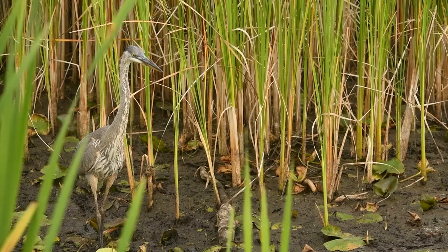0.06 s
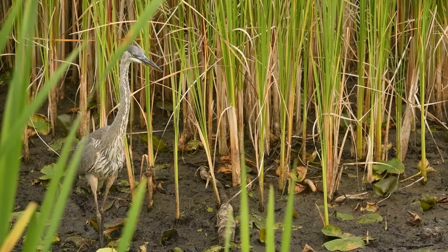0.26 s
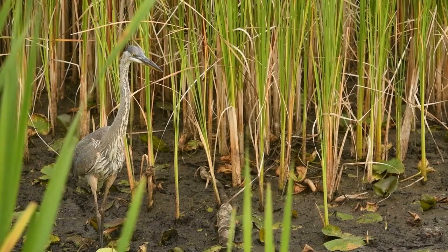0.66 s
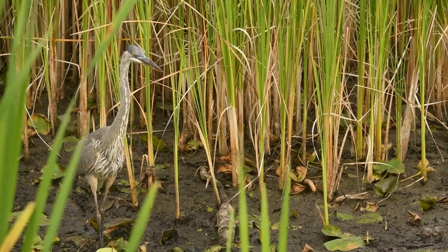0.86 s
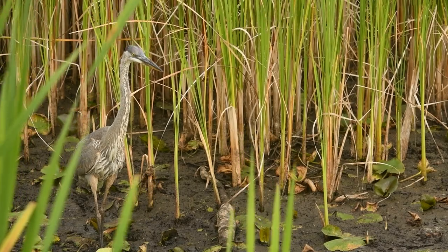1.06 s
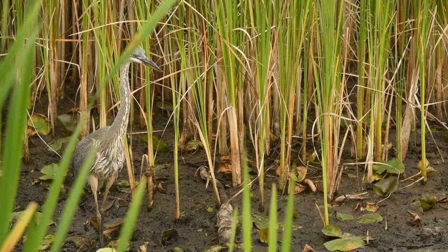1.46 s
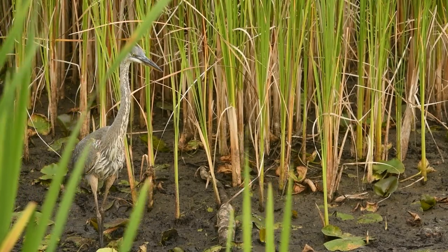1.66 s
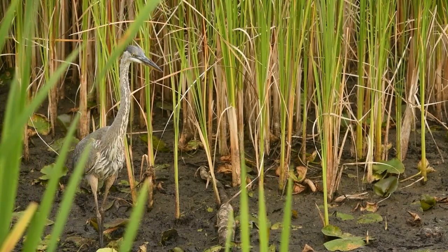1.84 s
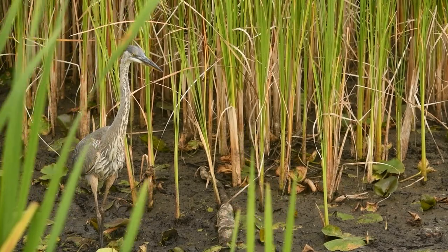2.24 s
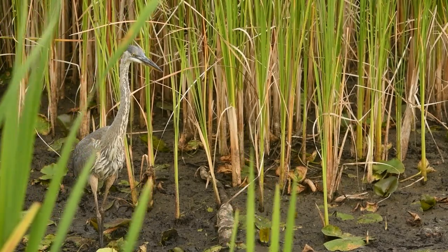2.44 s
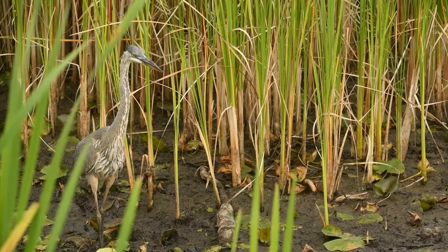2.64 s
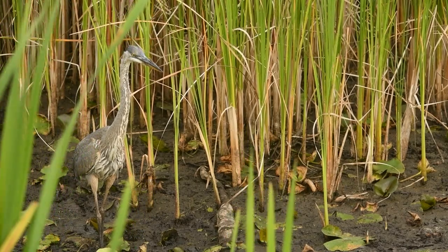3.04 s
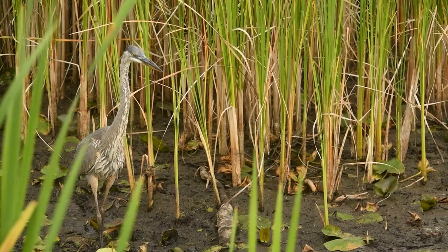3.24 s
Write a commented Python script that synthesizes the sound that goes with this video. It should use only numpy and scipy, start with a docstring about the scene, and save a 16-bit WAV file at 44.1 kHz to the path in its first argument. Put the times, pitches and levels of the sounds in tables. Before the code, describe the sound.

Wind buffets the microphone with low, fluttering thumps, strongest early and then easing. Behind it, reeds rustle softly and high crickets chirp over a distant rush at a wetland edge. Later, a dry stalk snaps.

```python
"""Wind at a reed bed

Eddies in a light wind thump on two microphone ports; the strongest overload the microphones and rasp.
Leaves hiss by friction and tick by impact over a far, even rush. Crickets chirp and trill by
stridulation, and dry stalks crack, with one clear snap among fainter ones."""
import sys
import numpy as np
from scipy import signal
from scipy.fft import rfft, irfft, next_fast_len
from scipy.io import wavfile
from scipy.ndimage import uniform_filter1d, map_coordinates

SR = 44100
rng = np.random.default_rng(int(sys.argv[2]) if len(sys.argv) > 2 else 0)


def to_wav(s):
    """Save 16-bit WAV."""
    ch = np.atleast_2d(s).T  # columns
    pcm = np.round(np.clip(ch, -1, 1) * 32767)  # PCM
    wavfile.write(sys.argv[1], SR, pcm.astype(np.int16))


N = 145530


def amp(db):
    """Amplitude ratio of a level in decibels."""
    return 10 ** (np.asarray(db) / 20)


def unit(x):
    """Normalisation to an rms of 1."""
    return x / np.sqrt(np.mean(x ** 2) + 1e-20)


def along(points, hz):
    """Interpolation of (frequency [Hz], value) points on a logarithmic frequency axis."""
    f, v = np.transpose(points)
    return np.interp(np.log(hz + 1), np.log(f + 1), v)


def curves(rows):
    """Linear interpolation in time: one value per sample for each column after the first."""
    times, *columns = np.transpose(rows)
    return np.array([np.interp(np.arange(N) / SR, times, c) for c in columns])


def wobble(rate):
    """Smooth random modulation: a spline through `rate` knots a second."""
    return map_coordinates(rng.standard_normal(1000), [np.arange(N) * rate / SR], mode="wrap")


def pan(db):
    """Left and right gains for a level difference, left minus right."""
    return amp([[db / 2], [-db / 2]])


def filtered(x, response):
    """Linear filtering: the spectrum of x is multiplied by a frequency response."""
    size = next_fast_len(N + 8192)
    return irfft(rfft(x, size) * response(np.fft.rfftfreq(size, 1 / SR)), size)[..., :N]


def noise(spectrum):
    """Coloured noise, incoherent between left and right."""
    return unit(filtered(rng.standard_normal((2, N)), lambda hz: amp(along(spectrum, hz))))


def rush(spectrum, coherence, left_lag_s, patchy_db):
    """Partly coherent stereo noise with an arrival delay and random patches of gain in time and pitch."""
    cells = signal.stft(rng.standard_normal((2, N)), nperseg=512)[2]
    patches = uniform_filter1d(rng.standard_normal(cells.shape[1:]), size=6, axis=0)
    patches = uniform_filter1d(patches, size=14, axis=1)
    pair = signal.istft(cells * amp(patchy_db * unit(patches)), nperseg=512)[1][:, :N]
    angle = lambda hz: np.arccos(np.clip(along(coherence, hz), -1, 1)) / 2
    colour = lambda hz: amp(along(spectrum, hz)) * [np.cos(angle(hz)), np.sin(angle(hz))]
    mid, side = filtered(pair, colour)
    delay = lambda hz: np.exp(1j * np.pi * left_lag_s * np.outer([-1, 1], hz))
    return unit(filtered(np.array([mid + side, mid - side]), delay))


def buffeting():
    """Turbulent pressure rumbles on each port; single eddies thump, flutter and kick as the core passes."""
    # turbulence on each port (time [s], level [dB])
    left_flow = [(0, -45.5), (.43, -50), (.55, -18.5), (.8, -21), (1.05, -18.5), (1.17, -21.5), (1.35, -26),
                 (1.7, -33.5), (2, -27.5), (2.45, -36.5), (2.9, -29.5), (3.3, -32.5)]
    right_flow = [(0, -50), (.39, -37.5), (.47, -19), (.6, -31), (.76, -18.5), (1.3, -25), (1.55, -20.5),
                  (1.7, -37), (1.95, -25.5), (2.2, -30.5), (2.38, -35), (2.55, -25.5), (2.88, -31),
                  (3, -36), (3.3, -41)]
    # single eddies (time [s], port [L or R], thump level [dB], flutter re thump [dB], half length [s])
    eddies = [(0.207, "R", -23, -31, 0.013), (0.331, "R", -15.5, -27, 0.012),
              (0.483, "R", -5.5, -11.5, 0.0065), (0.515, "R", -13, -16, 0.006),
              (0.545, "L", -23, -15, 0.0037), (0.566, "L", -10.5, -12, 0.007),
              (0.653, "L", -21, -4.5, 0.0033), (0.672, "L", -4.5, -15, 0.0019),
              (.678, "R", -12, -19, 0.0034), (0.73, "R", -10.5, -23, 0.0087), (0.799, "L", -12, -9, 0.0054),
              (0.801, "R", -14, -32, 0.0075), (0.829, "R", -16.5, -16, 0.0075),
              (0.87, "R", -16, -17, 0.0084), (0.909, "L", -11, -9, 0.0042),
              (0.926, "L", -8.5, -11.5, 0.0044), (0.953, "L", -14, -9.5, 0.0034),
              (0.998, "L", -17.5, -14, .012), (1.056, "L", -12, -18.5, .008),
              (1.085, "L", -9, -8.5, 0.0096), (1.096, "R", -13, -11.5, 0.0056),
              (1.121, "L", -12, -15, 0.0032), (1.229, "L", -6.5, -7.5, 0.0048),
              (1.243, "L", -9.5, -12, 0.0067), (1.253, "R", -7, -11, 0.0064),
              (1.282, "R", -14, -1.5, 0.0062), (1.3, "R", -10, -9, 0.0059), (1.349, "R", -17.5, -12, .016),
              (1.394, "R", -13.5, -17, 0.016), (1.422, "L", -13, -17.5, 0.0044),
              (1.477, "R", -19, -5.5, 0.005), (1.504, "R", -19.5, -17, 0.012),
              (1.605, "R", -20, -28, 0.019), (1.747, "L", -20, -43, 0.015),
              (1.881, "R", -19.5, -13.5, 0.015), (1.971, "R", -22.5, -12.5, 0.021),
              (2.022, "R", -18, -6.5, 0.01), (2.144, "L", -11, -32, 0.0045),
              (2.363, "L", -12.5, -34, 0.0043), (2.401, "L", -15.5, -21, 0.0047),
              (2.481, "L", -23, -24, 0.035), (2.716, "R", -21, -27, 0.012), (2.844, "R", -16, -50, 0.0079),
              (2.919, "R", -15.5, -16, 0.0079)]
    # spectra of the wind pressure (frequency [Hz], relative level [dB])
    rumble_spectrum = [(12, -10), (28, -4), (55, 2.5), (110, -4.5), (180, -11), (300, -19), (600, -56),
                       (1500, -65), (4000, -120)]
    thump_spectrum = [(15, -10), (35, -12.5), (65, -1.5), (120, 0), (180, -7), (280, -18), (500, -81),
                      (2000, -120)]
    flutter_spectrum = [(100, -93), (220, 13), (320, 15), (430, -4), (700, -12.5), (1000, -30), (1400, -31),
                        (3000, -40), (8000, -75)]
    flutter_grip = 0.74  # how closely the flutter follows the peaks of a thump
    core_s, core_at_db = 0.0013, -27.5  # half width of a core at this flutter level
    core_shrink, core_over_flutter_db = 0.37, 5  # stronger cores pass faster
    t = np.arange(N) / SR
    lumps = amp(3.75 * np.array([wobble(rate=15), wobble(rate=24)]))
    flow = amp(np.vstack([curves(left_flow), curves(right_flow)]))
    out = flow * unit(lumps * noise(rumble_spectrum))
    thump = noise(thump_spectrum)
    flutter = noise(flutter_spectrum) * (0.18 + np.logaddexp(0, 3 * thump)) ** flutter_grip
    for at_s, port, db, flutter_re_db, half_s in eddies:
        channel = "LR".index(port)
        flutter_db = db + flutter_re_db
        swell = np.exp(-.5 * ((t - at_s) / half_s) ** 2)
        for air, level in ((thump[channel], db), (flutter[channel], flutter_db)):
            burst = swell * air
            out[channel] += amp(level) * burst * np.linalg.norm(swell) / np.linalg.norm(burst)
        passage = (t - at_s) / core_s * amp(flutter_db - core_at_db) ** core_shrink
        spike = (1 - passage ** 2) * np.exp(-passage ** 2 / 2)
        out[channel] += amp(flutter_db + core_over_flutter_db) * spike
    return out


def leaves():
    """Friction between sliding leaves makes a hiss; their impacts ring as tiny damped ticks."""
    # spectrum of the hiss (frequency [Hz], relative level [dB])
    hiss_spectrum = [(600, -30), (2000, 2.5), (3500, 2.5), (5000, 3), (6300, 0), (7600, -1.5), (10000, -2),
                     (13800, -1.5), (15500, 1.5)]
    # likeness of the hiss at the two ports (frequency [Hz], coherence [0-1])
    coherence = [(2000, 0.31), (6000, 0.79), (10000, 0.11)]
    # strength of the rustle (time [s], left level [dB], right level [dB])
    rustle = [(0, -46, -46), (.33, -48, -46), (.52, -45.5, -41.5), (1.2, -45, -42), (1.6, -44, -41),
              (2.05, -42.5, -42), (2.4, -41, -41), (2.8, -44, -43), (3.3, -47.5, -46)]
    ticks_per_s, tick_re_hiss_db = 160, -21.5
    centre_hz, spread_octaves, decay_cycles = 6340, 2.4, 2.9
    hiss = rush(hiss_spectrum, coherence, left_lag_s=0.000097, patchy_db=1.18)
    ticks, t = np.zeros((2, N + SR)), np.arange(SR // 200) / SR
    for when, pitch, size, side in rng.random((1500, 4))[:int(ticks_per_s * N / SR)]:
        hz = centre_hz * 2 ** (spread_octaves * (pitch - .5))
        strength = amp(-3.2 * np.log(size + 0.05))
        tick = strength * np.sin(2 * np.pi * hz * t) * np.exp(-hz * t / decay_cycles)
        start = int(when * N)
        ticks[:, start:start + len(t)] += np.sqrt([[side], [1 - side]]) * tick
    return amp(curves(rustle)) * (hiss + amp(tick_re_hiss_db) * unit(ticks[:, :N]))


def stalk_snaps():
    """Fracture excites a dry stalk's resonance, and the sound scatters briefly among the stems."""
    # stalk resonances (time [s], level [dB], left minus right [dB], pitch [Hz], quality factor [1])
    snaps = [(0.4705, -42, 4, 2750, 2.2), (1.129, -51, -12, 12000, 1.5), (1.988, -42.5, -1, 6800, 3),
             (2.3104, -35.5, 0, 6400, 3), (2.3104, -41.5, 0, 1650, 2.5), (2.3104, -39, -7, 15000, 3),
             (2.3127, -35.5, -2, 12200, 3), (2.615, -45, -6, 13500, 2), (3.25, -48.5, -3, 13500, 1.5)]
    out = np.zeros((2, N))
    for at_s, db, pan_db, pitch_hz, q in snaps:
        t = np.maximum(np.arange(N) / SR - at_s, 0)
        fade = lambda t60_s: np.exp(-np.log(1000) * t / t60_s)
        resonance = lambda hz: 1j * hz * pitch_hz / (q * (pitch_hz ** 2 - hz ** 2) + 1j * hz * pitch_hz)
        fibres = unit(filtered(rng.standard_normal((2, N)), lambda hz: resonance(hz) ** 2))
        crack = amp(3) * fade(t60_s=.004)
        ring = fade(t60_s=.016)
        scatter = amp(-5) * fade(t60_s=.15)
        out += amp(db) * pan(pan_db) * (t > 0) * (crack + ring + scatter) * fibres
    return out


def stridulation(pitch_hz, width_hz, stroke_hz, depth):
    """A narrow wing resonance, amplitude-modulated by the strokes of the file and blurred by the stems."""
    narrow_band = lambda hz: np.exp(-.25 * (hz / width_hz) ** 2)
    in_phase, quadrature = filtered(rng.standard_normal((2, 2, N)), narrow_band)
    phase = 2 * np.pi * np.cumsum(pitch_hz * np.ones(N)) / SR
    stroke_phase = 2 * np.pi * stroke_hz * np.arange(N) / SR + 1.1 * wobble(rate=7.4)
    strokes = 1 + depth * np.sin(stroke_phase)
    return unit((in_phase * np.cos(phase) + quadrature * np.sin(phase)) * strokes)


def crickets():
    """Stridulation: three crickets chirp on the left, pitch rising with effort, while others trill."""
    # chirping crickets (first peak [s], period [s], top pitch [Hz], left level [dB], swell time [s])
    chirpers = [(.345, .514, 8330, -45.3, .06), (.265, .367, 7960, -54, .07), (.175, .383, 7690, -55, .07)]
    # steady trills (pitch [Hz], width [Hz], stroke rate [Hz], depth [0-1], left [dB], right [dB])
    trills = [(4970, 105, 110, 0, -64.5, -63.5), (5370, 274, 62, 0.06, -53.5, -68.5),
              (11180, 300, 31, 0.4, -61.5, -67)]
    release_s, sag_hz, right_re_left_db = .032, 220, -10
    t, out = np.arange(N) / SR, np.zeros((2, N))
    for first_s, period_s, top_hz, db, swell_s in chirpers:
        from_peak_s = (t - first_s + period_s / 2) % period_s - period_s / 2
        effort = np.exp(-(from_peak_s / np.where(from_peak_s < 0, swell_s, release_s)) ** 2)
        pitch_hz = top_hz - sag_hz * (1 - effort)
        out += amp(db) * effort * stridulation(pitch_hz, width_hz=100, stroke_hz=94, depth=.55)
    out[1] *= amp(right_re_left_db)
    for pitch_hz, width_hz, stroke_hz, depth, left_db, right_db in trills:
        out += amp([[left_db], [right_db]]) * stridulation(pitch_hz, width_hz, stroke_hz, depth)
    return out


def far_rush():
    """The distant roar of the landscape; time and level differences place it a little to the right."""
    # spectra of the bass and middle bands (frequency [Hz], relative level [dB])
    bass_spectrum = [(30, -19), (100, 4), (220, -1), (350, -1), (500, -6.5), (800, -14), (1400, -51),
                     (4000, -86)]
    middle_spectrum = [(150, -39), (400, -10), (750, -3), (1150, -6.5), (1650, -6.5), (2300, -14),
                       (3500, -21.5), (6000, -25.5), (12000, -43)]
    # likeness of the rush at the two ports (frequency [Hz], coherence [0-1])
    coherence = [(80, .6), (300, .9), (700, .87), (1500, .62), (2500, .45), (4000, .6), (9000, .4)]
    # strength of the rush (time [s], bass level [dB], middle level [dB])
    levels = [(0, -43, -43), (.3, -42.5, -44.5), (.65, -41, -43), (1.2, -38, -42.5), (1.7, -40, -42),
              (2.1, -36, -41.5), (2.45, -34.5, -41), (2.85, -37, -41), (3.15, -43, -42.5),
              (3.3, -42, -42.5)]
    sway_db, left_lag_s = .5, 0.000096
    bass_db, middle_db = curves(levels)
    bass_gain = amp(bass_db + sway_db * wobble(rate=47))
    bass = bass_gain * rush(bass_spectrum, coherence, left_lag_s, patchy_db=-1.0)
    middle_gain = amp(middle_db + sway_db * wobble(rate=8.07))
    middle = middle_gain * rush(middle_spectrum, coherence, left_lag_s, patchy_db=0.63)
    return (bass + middle) * pan(db=-1)


def scene():
    """Superposition of all the pressures at the two ports."""
    return buffeting() + far_rush() + stalk_snaps() + crickets() + leaves()


def record(dry):
    """Saturation in each microphone flattens the strongest thumps; a band limit cuts the highest treble."""
    overload_db, knee, top_hz = -7.5, 3.3, 15850
    flattened = dry / (1 + np.abs(dry / amp(overload_db)) ** knee) ** (1 / knee)
    return filtered(flattened, lambda hz: hz < top_hz)


dry = scene()
out = record(dry)
to_wav(out)
```